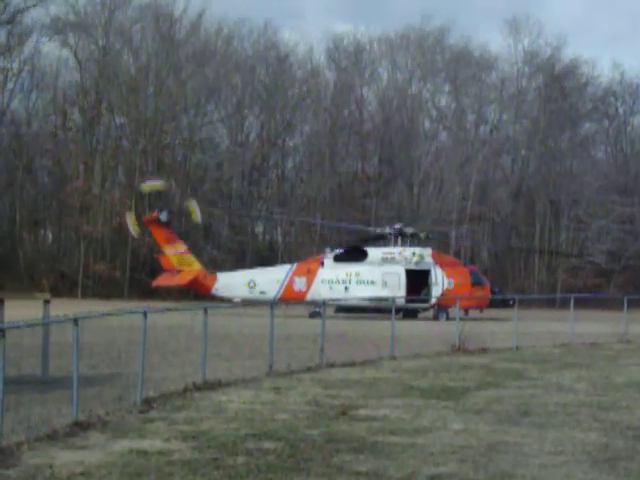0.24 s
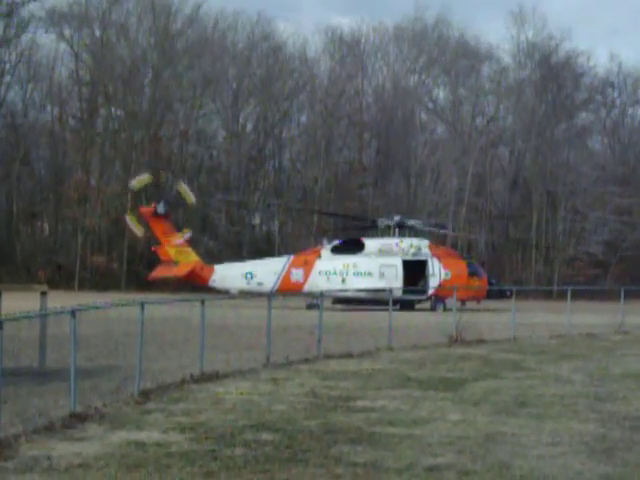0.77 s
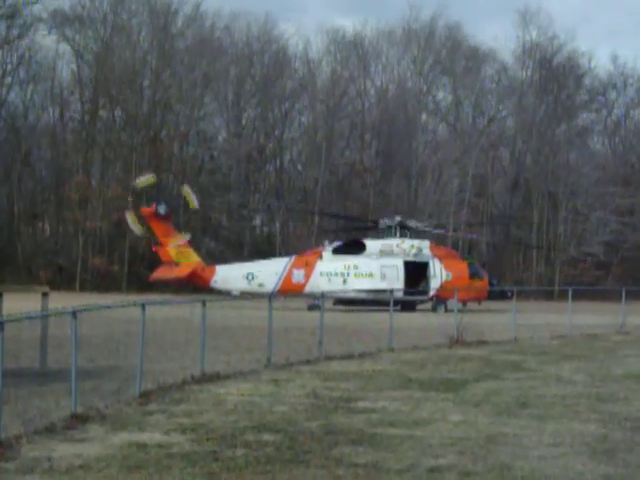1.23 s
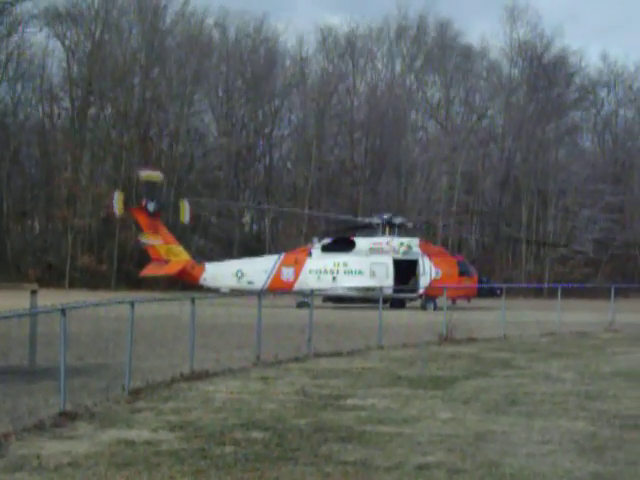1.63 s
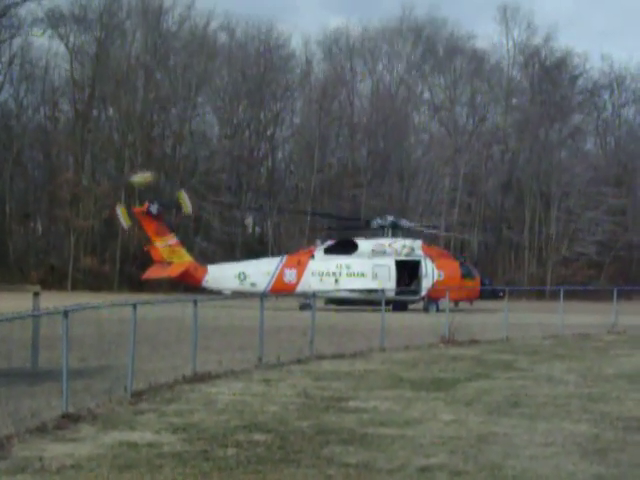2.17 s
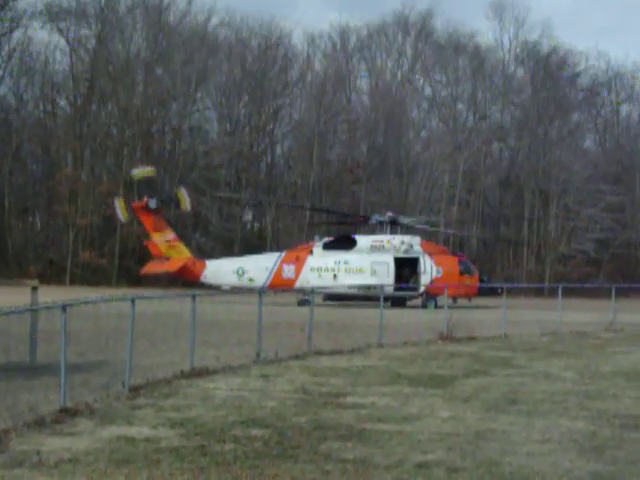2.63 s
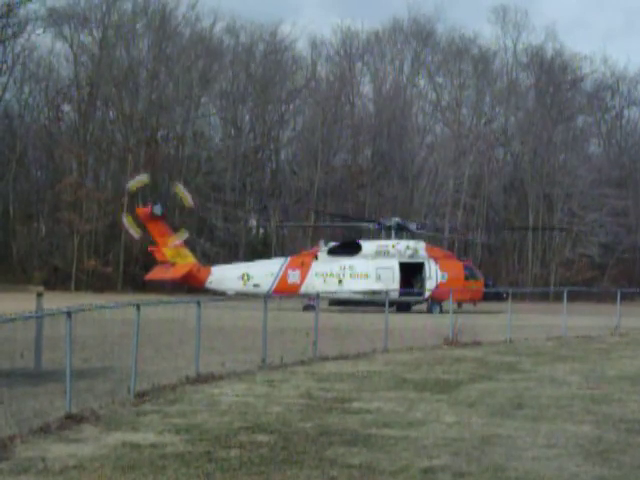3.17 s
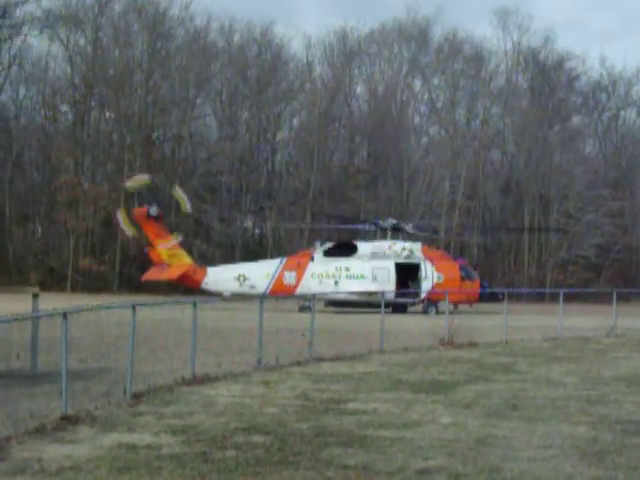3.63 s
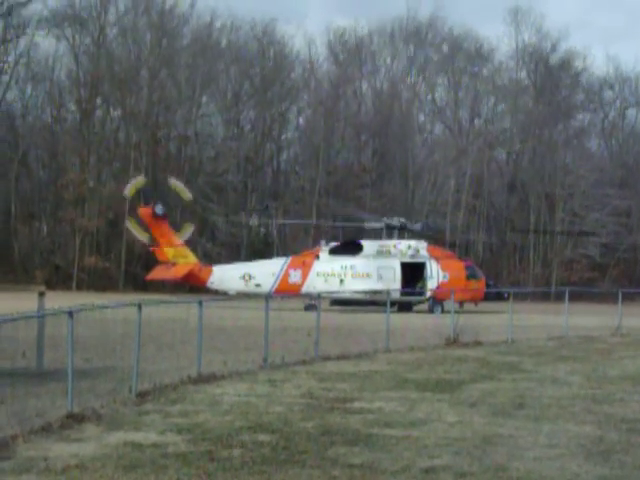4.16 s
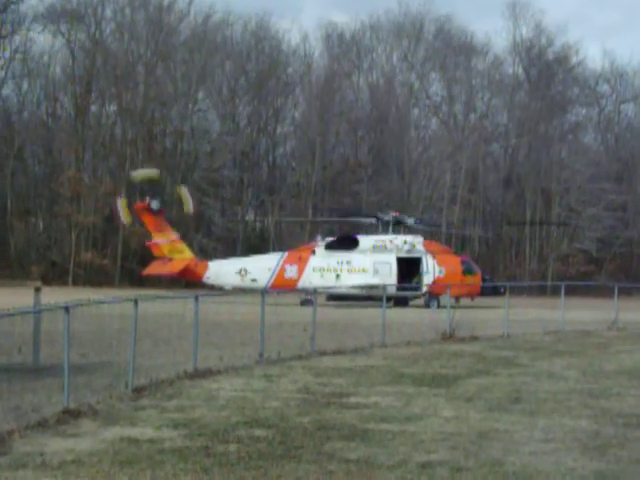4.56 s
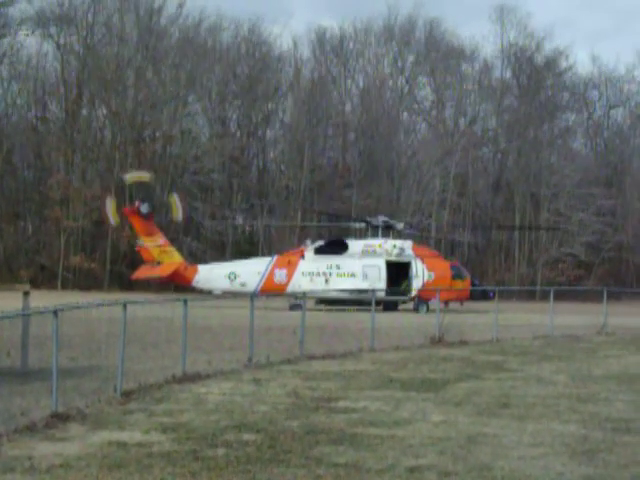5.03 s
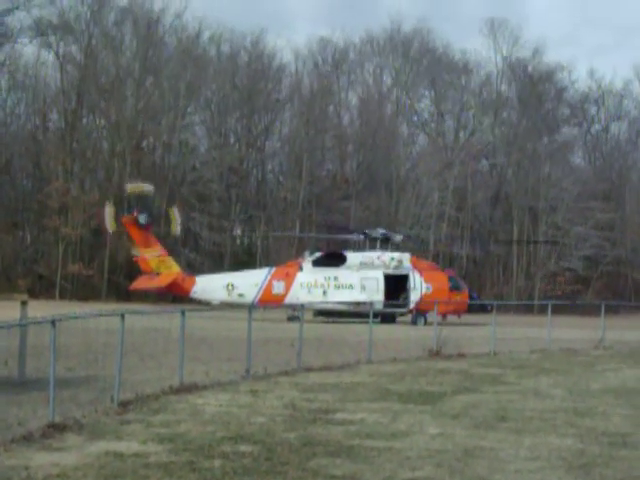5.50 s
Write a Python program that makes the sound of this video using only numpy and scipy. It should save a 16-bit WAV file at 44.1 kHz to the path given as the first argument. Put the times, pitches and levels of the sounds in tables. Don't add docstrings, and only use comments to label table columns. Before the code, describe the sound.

Continuous fast helicopter chop outdoors, running from beginning to end without take-off. Roar sinks around one second so individual slaps stand out, then swells again and sways with the wind. Faint tail-rotor hum and thin high turbine whine sit beneath. Single far spot, mono, clipped peaks, little treble.

```python
import sys
import numpy as np
from scipy import signal
from scipy.fft import rfft, irfft, next_fast_len
from scipy.io import wavfile

SR = 44100
rng = np.random.default_rng(int(sys.argv[2]) if len(sys.argv) > 2 else 0)


def linear_from_db(decibels):
    return 10 ** (np.asarray(decibels, float) / 20)


def file_out(sig):
    cols = np.atleast_2d(sig).T
    lim = np.clip(cols, -1, 1)
    pcm = np.round(lim * 32767).astype(np.int16)
    wavfile.write(sys.argv[1], SR, pcm)


N = 254758

BLADE_HZ, TAIL_HZ = 17.19, 79.3
FIRST_BLADE_S = .010
USUAL_ROAR_DB = -13


def in_time(rows):
    s, *columns = np.transpose(rows)
    return np.array([np.interp(np.arange(N) / SR, s, column) for column in columns])


def rms_one(x):
    return x / np.sqrt(np.mean(x ** 2) + 1e-20)


def drift(rate):
    r = np.exp(-80 * np.pi * rate / SR)
    slow = signal.lfilter([1], [1, -2 * r, r * r], rng.standard_normal(N // 40 + 2002))[2000:]
    return np.interp(np.arange(N) / 40, np.arange(len(slow)), rms_one(slow - slow.mean()))


# multiple of the tail rotor's rate, level in dB.
TAIL_HUM = [(1, -47), (2, -46), (3, -45), (4, -46)]
# pitch in Hz, level in dB.
TURBINE_WHINE = [(5136, -55), (5889, -71)]


def tones():
    turn = 2 * np.pi * np.arange(N) / SR
    lines = [(k * TAIL_HZ, db) for k, db in TAIL_HUM] + TURBINE_WHINE
    return sum(linear_from_db(db + 2 * drift(1.7)) * np.sin(hz * turn + 0.68 * drift(2.0)) for hz, db in lines)


# pitch in Hz, level in dB per Hz.
NOISE_COLOUR = [(15, -59.5), (25, -25.5), (53, -24.5), (176, -4), (311, -4.5), (366, -7.5), (439, -8),
                (649, -2.5), (1070, -12.5), (1620, -24), (2400, -25.5), (2750, -21), (3540, -33),
                (4990, -34.5), (6000, -27), (7800, -73.5), (13200, -120)]
# pitch in Hz, width in Hz, height in dB.
COLOUR_HUMPS = [(2740, 370, 0.5), (5080, 390, 1.5), (750, 160, 2.5), (4915, 250, 3.5)]


def noise_bands():
    size = next_fast_len(N)
    hz = np.arange(size // 2 + 1) * SR / size + 1e-3
    colour_hz, level_db = np.transpose(NOISE_COLOUR)
    colour_db = np.interp(np.log(hz), np.log(colour_hz), level_db)
    for top_hz, width_hz, db in COLOUR_HUMPS:
        colour_db += db * np.exp(-((hz - top_hz) / width_hz) ** 2)
    colour_db += -3.5 * np.exp(-((hz - 403) / 70) ** 2)
    white = rfft(rng.standard_normal((2, size)))
    centres = 25 * 2 ** np.arange(0, 8.1, .5)
    bands = []
    for k, centre in enumerate(centres):
        share = np.cos(np.pi / 2 * np.clip(2 * np.log2(hz / centre), -1, 1))
        bands.append(irfft(white[k % 2] * linear_from_db(colour_db) * share, size)[:N])
    return centres, rms_one(np.array(bands))


LAYER_PITCH = [200, 630, 1100, 2600]


def between_layers(levels_db, hz):
    place = np.interp(np.log(hz), np.log(LAYER_PITCH), np.arange(len(levels_db)))
    below = min(int(place), len(levels_db) - 2)
    return levels_db[below] + (place - below) * (levels_db[below + 1] - levels_db[below])


# middle in seconds, depth in dB, half length in seconds.
ROAR_LULLS = [(0.277, 0, 0.017), (0.62, -4, .015), (0.819, -4, 0.028), (2.037, -4, .015),
              (2.151, -3.5, 0.037), (2.266, -3, .02), (2.692, -4.5, 0.018), (3.135, -4.5, 0.011),
              (3.253, 0, 0.011), (3.667, -4, .02), (3.894, -6.5, .015), (4.297, -5, 0.035),
              (4.593, -4.5, 0.018), (4.772, -2.5, 0.0071)]


def lulls():
    t = np.arange(N) / SR
    return sum(db * np.exp(-.5 * ((t - s) / half_s) ** 2) for s, db, half_s in ROAR_LULLS)


# time in seconds, roar in dB,
# blade in dB above usual, thump in dB above usual, clearness of the air in dB.
FIELD_WIND = [(0, -15.5, 0.5, 8.5, 4), (.4, -9.5, 0, 3, 0.5), (.92, -12, 0.5, 3.5, 2),
              (1.03, -19.5, 3.5, 2, -1), (1.36, -17, 3.5, 0, -1.5), (1.6, -11.5, -0.5, 5, 1.5),
              (1.94, -9, -1, -3, -1), (2.25, -11, -0.5, 3, -1.5), (2.47, -9, -1, 1.5, 0),
              (2.75, -11, 0, -3.5, -0.5), (2.98, -9, 0.5, -0.5, 0.5), (3.5, -12.5, 0.5, -2, -0.5),
              (3.75, -12.5, -1, -.5, 0.5), (4.02, -11, 0, -1, -0.5), (4.33, -14, 0.5, -4, 0.5),
              (4.85, -10.5, 0.5, -3.5, 0.5), (5.25, -8.5, -3.5, 2, 0), (5.78, -10, 0, 2, -1)]
ROAR_LEVEL = [-9, -1, -1.5, -1.5]
ROAR_WIND_SHARE = [0.16, 1.0, .6, 0.21]
ROAR_WANDER = [2, 0.47, 1.4, 0.59]
CLEAR_SHARE = [0, 0, .5, 1]


def roar_layers():
    wind = in_time(FIELD_WIND)
    swing_db, clear_db, lull_db = wind[0] - USUAL_ROAR_DB, wind[3], lulls()
    flutter_db = 1.42 * np.cos(2 * np.pi * TAIL_HZ * np.arange(N) / SR + 0.6 * drift(1.0))
    layers = zip(ROAR_LEVEL, ROAR_WIND_SHARE, CLEAR_SHARE, ROAR_WANDER)
    return [db + share * swing_db + lull_db + clear * clear_db + own_db * drift(2.0) + flutter_db
            for db, share, clear, own_db in layers]


def roar_band(layers_db, hz, gust):
    patchy_db = 1.0 * (gust + 1.2 * drift(29))
    rumble_db = -0.5 * drift(1.5) * (hz < 150)
    return linear_from_db(between_layers(layers_db, hz) + patchy_db + rumble_db)


BLADE_LEVEL = [-1.5, -2.5, -1.5, -2.5]
BLADE_SCATTER = [2, 2, 2.5, 2]
# time in seconds, level in dB above usual, brightness in dB per layer, half length in ms.
VORTEX_CRACKS = [(0.087, 1.5, 2, 11), (0.778, -2, 3.5, 11), (.954, 2, 0, 13), (1.01, 4.5, -2.5, 8.8),
                 (1.072, 3.5, -2, 4.5), (1.134, 0, -1, 7), (1.189, 1.5, -1.5, 8.4), (1.246, 3, 0, 4.5),
                 (1.305, 2.5, -2, 7), (1.364, -5, 3.5, 6), (1.421, 1, -0.5, 9.7), (1.481, 1, 1.5, 6.2),
                 (1.538, -0.5, 3, 10), (1.597, 5, -1, 11), (1.881, 8.5, -5.5, 10), (2.119, 6.5, -3, 7.1),
                 (2.588, 3, 1.5, 10), (2.701, 2, 2, 12), (2.75, -0.5, -3, 17), (3.341, 5.5, -2.5, 8),
                 (3.519, 3, -1.5, 8.7), (3.691, 1.5, -2, 9), (3.86, 0.5, -0.5, 10), (4.214, 1, 0.5, 11),
                 (4.387, 1.5, -0.5, 9), (4.504, 4, -2.5, 5.3), (4.562, 8.5, -3.5, 5.5),
                 (4.797, 6.5, -2.5, 5), (5.085, 0.5, 4.5, 6.4), (5.441, 2, -5.5, 16)]


def blade_passes():
    beat = np.arange(FIRST_BLADE_S, N / SR - .04, 1 / BLADE_HZ)
    chance = rng.standard_normal((len(beat), 6))
    roar_db, blade_db, thump_db = in_time(FIELD_WIND)[:3, (beat * SR).astype(int)]
    passes = beat + .017 + .002 * chance[:, 4]
    levels_db = np.array(BLADE_LEVEL)[:, None] + np.array([thump_db, blade_db, blade_db, blade_db])
    scatter_db = np.array(BLADE_SCATTER)[:, None] * chance[:, :4].T
    half_s = .010 * np.exp(0.17 * (roar_db - USUAL_ROAR_DB) + 0.13 * chance[:, 5])
    for s, db, bright_db, half_ms in VORTEX_CRACKS:
        k = np.argmin(abs(passes - s))
        passes[k], half_s[k] = s + .002, half_ms / 1000
        scatter_db[1:, k] = db + bright_db * np.arange(3)
    return passes, levels_db + scatter_db, half_s


def blade_swell(passes, half_s):
    t = np.arange(N) / SR
    nearest = np.searchsorted((passes[1:] + passes[:-1]) / 2, t)
    since = (t - passes[nearest]) / half_s[nearest]
    rise, fall = 1.3, 0.7
    return np.exp(-.5 * (since / np.where(since < 0, rise, fall)) ** 2), nearest


# pitch in Hz, power of the swell.
SWELL_SHARPNESS = [(250, 0.97), (600, 1.28), (1100, 0.59), (2600, 1.8), (5000, 2.8)]


def swish_band(blade_db, hz, swell, nearest, eddies):
    edge_db = -7 * (hz < 350) - 3 * (hz > 4000) + 1.9 * (hz > 850)
    swish = linear_from_db(between_layers(blade_db, hz)[nearest] + 2.5 + 2.84 * eddies + edge_db)
    return swish * swell ** np.interp(hz, *np.transpose(SWELL_SHARPNESS))


# time in seconds, top in Hz.
EXHAUST_TOP = [(0.0, 690), (0.18, 710), (0.42, 634), (0.58, 617), (1.11, 724), (1.35, 642), (1.96, 670),
               (2.32, 613), (2.61, 598), (2.91, 657), (3.63, 596), (4.1, 626), (4.3, 682), (4.67, 684),
               (4.94, 713), (5.28, 655), (5.55, 687), (5.78, 665)]


def air_noise(passes, blade_db, half_s):
    centres, bands = noise_bands()
    layers_db = roar_layers()
    swell, nearest = blade_swell(passes, half_s)
    top_octaves = np.log2(in_time(EXHAUST_TOP)[0] / 670)
    gust, eddies = drift(12), drift(130)
    out = np.zeros(N)
    for hz, band in zip(centres, bands):
        roar = roar_band(layers_db, hz, gust)
        swish = swish_band(blade_db, hz, swell, nearest, eddies)
        lean_db = 45 * top_octaves * np.log2(hz / 670) * (500 < hz < 900)
        out += band * linear_from_db(lean_db) * np.hypot(roar, swish)
    return linear_from_db(-23.5) * out


# time after its start in seconds, pitch in Hz, level in dB.
THUMP_GLIDE = [
    (0, 360, -16),
    (.007, 320, -2),
    (.013, 245, 0),
    (.019, 175, -1),
    (.025, 115, -7),
    (.038, 65, -19),
]


def thumps(pass_db):
    at = ((FIRST_BLADE_S + np.arange(len(pass_db)) / BLADE_HZ) * SR).astype(int)
    at = at + (.00096 * SR * drift(0.6)[at]).astype(int)
    clicks = np.zeros(N)
    clicks[at] = linear_from_db(pass_db - 14.5)
    s, hz, db = np.transpose(THUMP_GLIDE)
    t = np.arange(0, s[-1], 1 / SR)
    phase = 2 * np.pi * np.cumsum(np.interp(t, s, hz)) / SR
    pulse = linear_from_db(np.interp(t, s, db)) * np.sin(phase)
    return signal.oaconvolve(clicks, pulse)[:N]


def scene():
    passes, blade_db, half_s = blade_passes()
    air = air_noise(passes, blade_db, half_s)
    return (tones() + air + thumps(blade_db[0]))[None]


def top_cut(x):
    return signal.sosfilt(signal.butter(12, 15830, fs=SR, output="sos"), x)


def record(dry):
    flat = np.clip(dry - .0034, -.71, .71)
    steep = signal.cheby2(6, 30, 6500, fs=SR, output="sos")
    narrow = signal.sosfiltfilt(steep, flat)
    cut = np.clip(narrow, -.707, .707)
    return top_cut(cut)


dry = scene()
out = record(dry)
file_out(out)
```